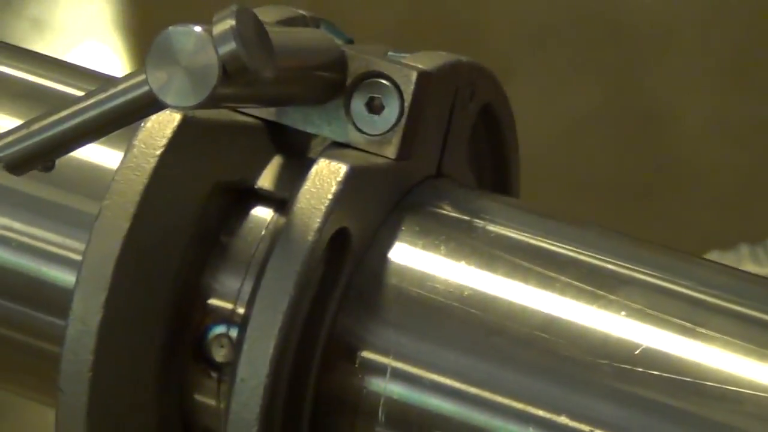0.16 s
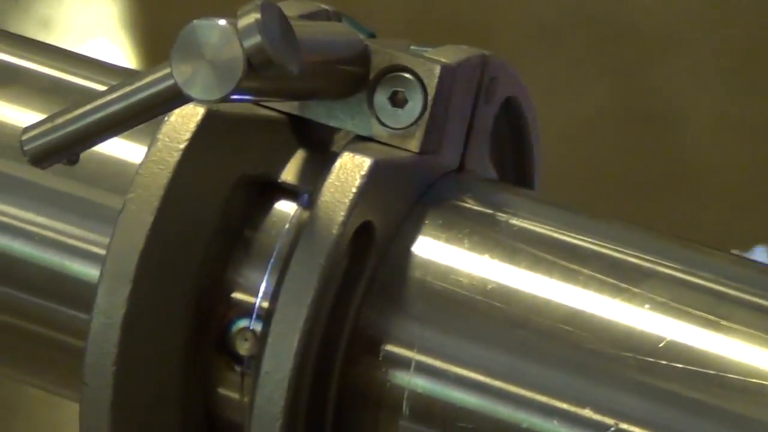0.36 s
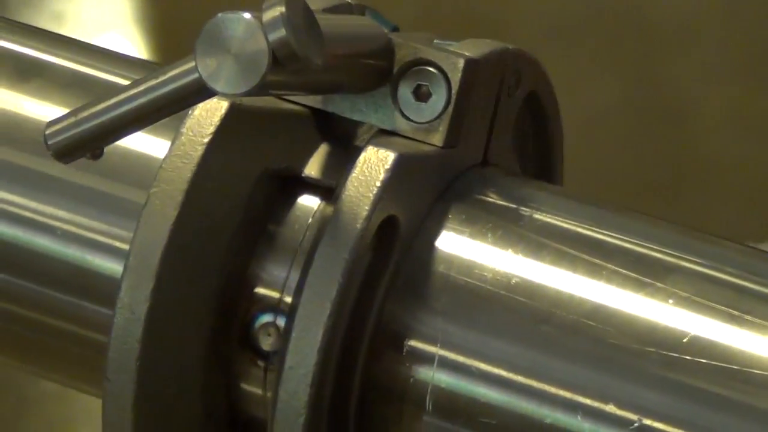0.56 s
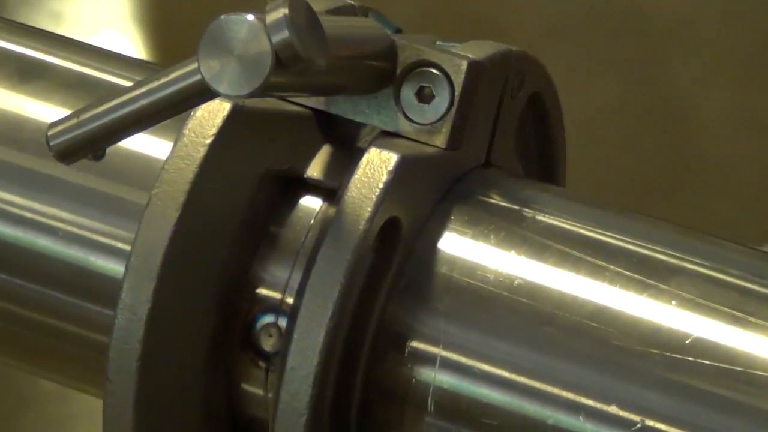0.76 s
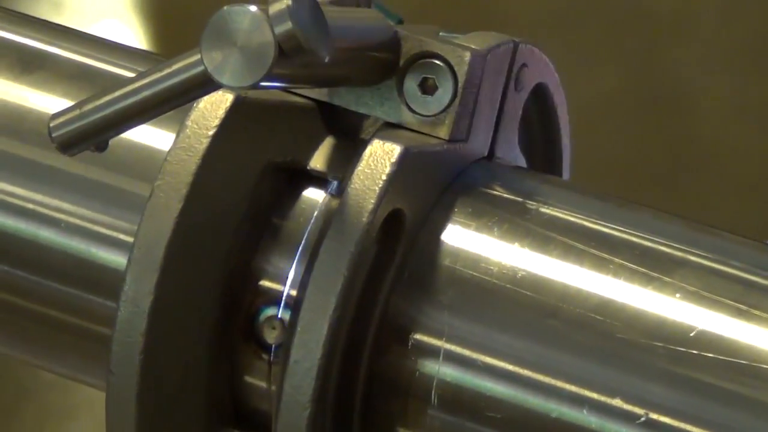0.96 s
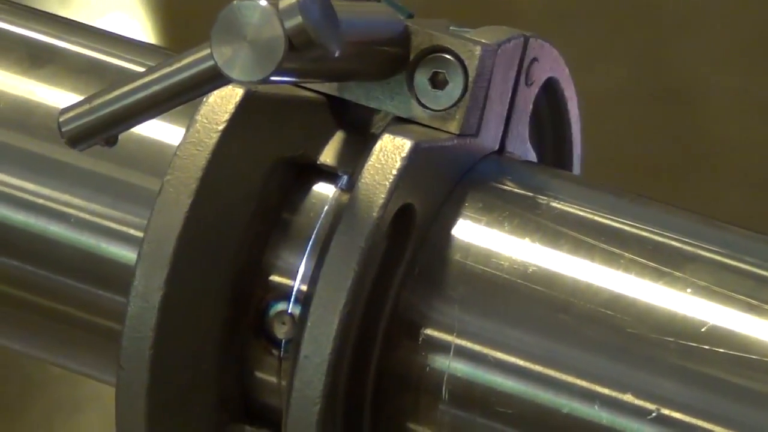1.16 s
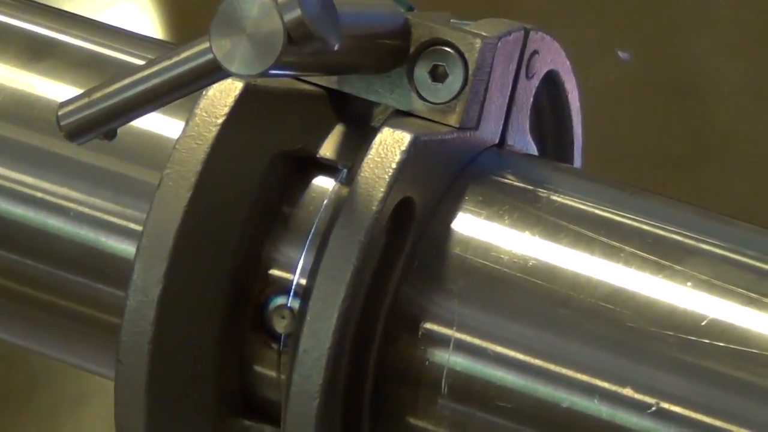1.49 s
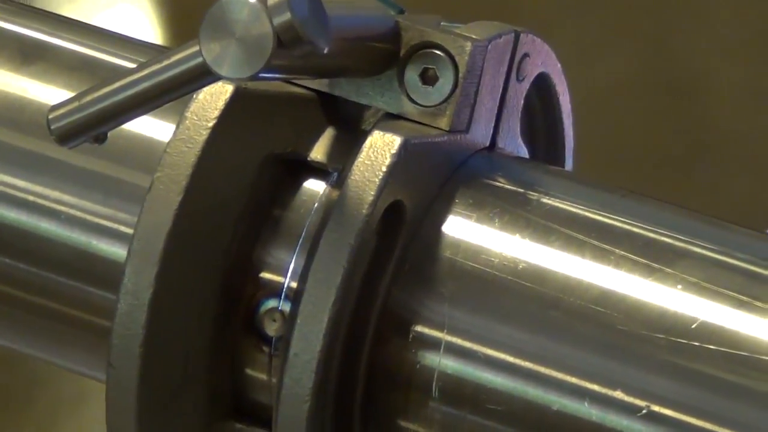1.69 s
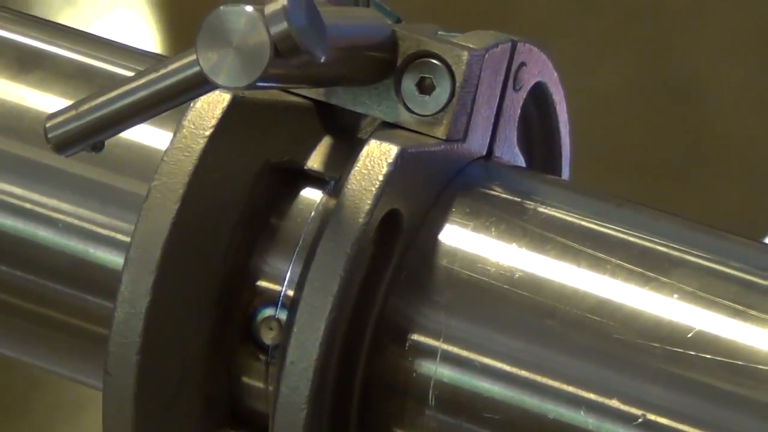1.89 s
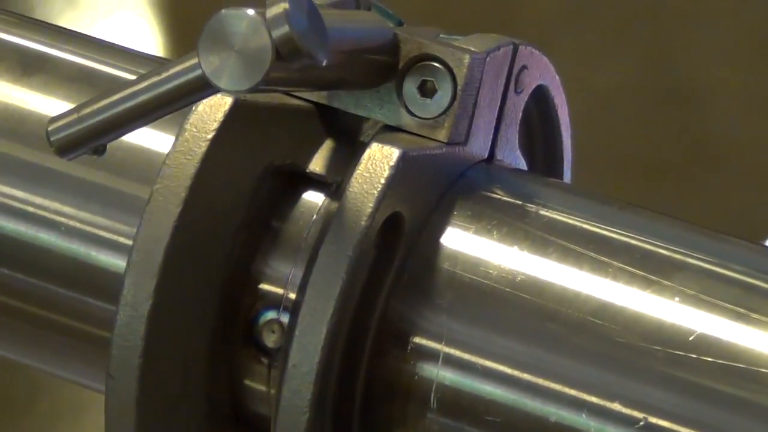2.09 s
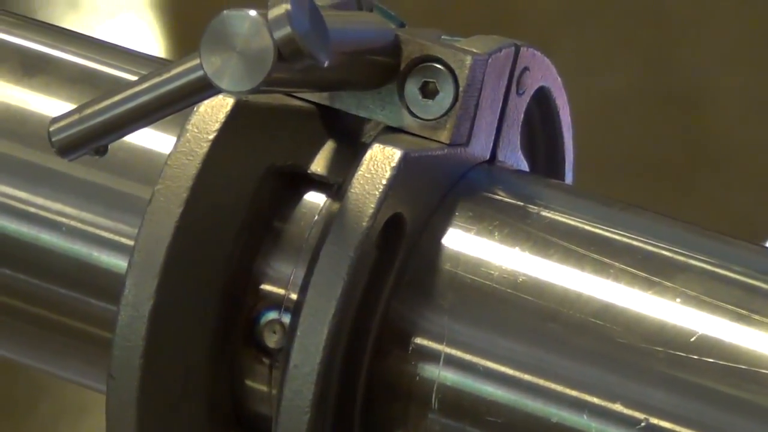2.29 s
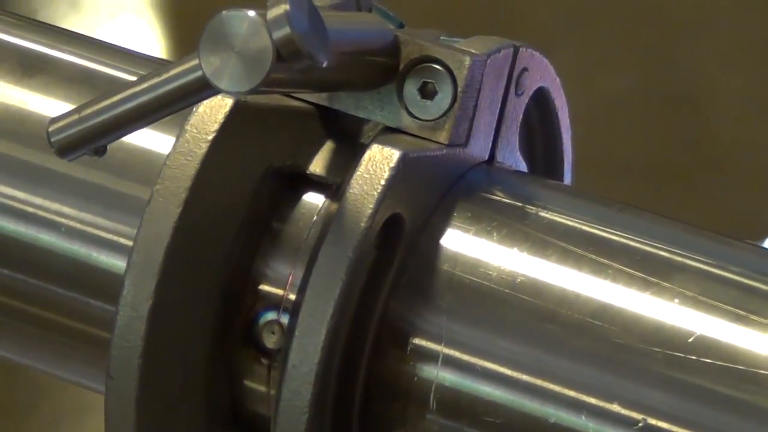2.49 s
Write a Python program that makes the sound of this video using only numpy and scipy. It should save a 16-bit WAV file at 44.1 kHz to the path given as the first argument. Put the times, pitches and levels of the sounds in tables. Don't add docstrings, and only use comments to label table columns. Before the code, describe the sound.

Loud gas hiss from a welding head on steel tube, clacking valve switches, slowly dying away

```python
import sys
import numpy as np
from scipy import signal
from scipy.fft import rfft, irfft, next_fast_len
from scipy.io import wavfile
from scipy.ndimage import uniform_filter1d, minimum_filter1d, map_coordinates

SR = 44100
rng = np.random.default_rng(int(sys.argv[2]) if len(sys.argv) > 2 else 0)


def voltage_ratio(decibels):
    exponent = np.asarray(decibels, float) / 20
    return 10 ** exponent


def wrap_up_sound(samples):
    columns = np.atleast_2d(samples).T
    tamed = np.clip(columns, -1, 1)
    steps = np.round(tamed * 32767).astype(np.int16)
    wavfile.write(sys.argv[1], SR, steps)


N = 116865


def unit(x):
    return x / np.sqrt(np.mean(x ** 2) + 1e-20)


def along(points, hz):
    f, value = np.transpose(points)
    return np.interp(np.log(hz + 1), np.log(f + 1), value)


def curves(rows):
    s, *columns = np.transpose(rows)
    return [np.interp(np.arange(N) / SR, s, column) for column in columns]


def wobble(rate):
    knots = rng.standard_normal(int(N * rate / SR) + 4)
    return map_coordinates(knots, [np.arange(N) * rate / SR])


def filtered(x, response):
    size = next_fast_len(N + SR // 2)
    spectrum = rfft(x, size) * response(np.fft.rfftfreq(size, 1 / SR))
    return irfft(spectrum, size)[..., :N]


def rush(colour, modes, ring_db, side, patchy_db):
    z = signal.stft(rng.standard_normal((2, N)), nperseg=512)[2]
    patches = uniform_filter1d(rng.standard_normal(z.shape[1:]), 4, 0)
    patches = uniform_filter1d(patches, 10, 1)
    pair = signal.istft(z * voltage_ratio(patchy_db * unit(patches)), nperseg=512)[1][:, :N]

    def response(f):
        power = 1
        for hz, width, db in modes:
            height = voltage_ratio(db + ring_db - along(colour, hz))
            power = power + height ** 2 / (1 + (2 * (f - hz) / width) ** 2)
        shape = voltage_ratio(along(colour, f)) * np.sqrt(power)
        return shape * [1 + 0 * f, voltage_ratio(along(side, f))]

    mid, diff = filtered(pair, response)
    return unit(np.array([mid + diff, mid - diff]))


def narrow(hz, width_hz, steady):
    phase = 2 * np.pi * np.cumsum(hz + 12 * wobble(30)) / SR
    return unit((steady + wobble(width_hz)) * np.cos(phase) + wobble(width_hz) * np.sin(phase))


# frequency in Hz, level in dB per Hz.
SHOP_COLOUR = [(15, -46), (25, -19), (350, -5), (380, -6), (423, -1), (471, -6.5), (511, -8.5), (585, -6.5),
               (15600, -37)]
# frequency in Hz, width in Hz, height over the air in dB.
FANS = [(200, 22, 2.5), (251, 14.5, 5.5), (364.4, 3.3, 14.5), (421, 6.2, 8), (670, 13, -8)]
# frequency in Hz, level in dB.
HUMS = [
    (29, -57),
    (58, -57),
    (99, -52.5),
]
# frequency in Hz, side under mid in dB.
SHOP_SIDE = [(60, -22), (240, -19.5), (950, -12), (3770, -8), (15000, -4)]
SHOP_DB = -37


def shop():
    out = 0
    for hz, db in HUMS:
        phase = 2 * np.pi * np.cumsum(hz + 1.14 * wobble(4.87)) / SR
        out = out + voltage_ratio(db + 3.3 * wobble(4.2)) * np.sin(phase)
    swell_s, swell_length_s = 2.47, .35
    swell = np.exp(-((np.arange(N) / SR - swell_s) / swell_length_s * 2) ** 2)
    out = out + voltage_ratio(-53) * swell * narrow(60, width_hz=40, steady=.3)
    fans = [(hz, width, db + along(SHOP_COLOUR, hz)) for hz, width, db in FANS]
    air = rush(SHOP_COLOUR, fans, 0, SHOP_SIDE, patchy_db=1.5)
    return out + voltage_ratio(SHOP_DB + 0.09 * wobble(1.8)) * air


# frequency in Hz, width in Hz.
TUBE = [(2935, 45), (3745, 65), (4530, 100), (4740, 50), (5285, 60), (6645, 50), (6850, 60), (7040, 90),
        (7330, 50), (7565, 55), (7770, 45), (7960, 35), (8590, 140), (8950, 70), (9340, 60), (9970, 65),
        (10350, 50), (11350, 50), (12100, 80), (13500, 200)]


def ringing(colour, ring_db):
    return [(hz, width, db + along(colour, hz)) for (hz, width), db in zip(TUBE, ring_db)]


def hollowed(x, dips):
    def response(f):
        gain = 1
        for hz, width, share in dips:
            gain = gain * (1 - share / (1 + (2 * (f - hz) / width) ** 2))
        return gain

    return filtered(x, response)


# opens in seconds, shuts in seconds, rise in seconds.
FILL_TIMES = [
    (.221, .4008, .04),
    (.607, .9048, .025),
]
# level in dB, slope in dB per second.
FILL_LEVELS = [
    (-18.5, 16),
    (-15.5, -11),
]
# frequency in Hz, level in dB per Hz.
FILL_COLOUR = [(900, -29.5), (2100, -19), (2700, -9), (5700, -11), (6500, -8), (9000, -4), (11500, -9),
               (12500, -12.5), (15700, -23.5)]
FILL_RING_DB = [5.5, 10.5, 3.5, -5, -4, 5.5, 9.5, -6, -5, -2, -10, -4, 4, 7, 4, 6, 7, -8, -3, 4]
# frequency in Hz, width in Hz, share removed.
INLET_DIPS = [(12450, 600, .7), (14900, 400, .5)]
# frequency in Hz, side under mid in dB.
NEAR_SIDE = [(60, -26), (240, -7), (950, -49), (3770, -16), (15000, -26)]


def filling():
    leak_db, shut_s = -12, .0006
    t, gain = np.arange(N) / SR, 0
    for (opens, shuts, rise), (db, slope) in zip(FILL_TIMES, FILL_LEVELS):
        rise_db = leak_db * np.clip(1 - (t - opens) / rise, 0, 1)
        is_open = (t > opens) * np.clip((shuts - t) / shut_s, 0, 1)
        gain = gain + voltage_ratio(db + slope * (t - opens) + rise_db) * is_open
    turbulence = voltage_ratio(0.44 * wobble(42.0) + 0.35 * wobble(300) + 1.4 * wobble(2500))
    hiss = rush(FILL_COLOUR, ringing(FILL_COLOUR, FILL_RING_DB), 0, NEAR_SIDE, patchy_db=0.5)
    return gain * turbulence * hollowed(hiss, INLET_DIPS)


# time in seconds, hiss in dB, low roar in dB.
VENT_ONE = [
    (.4008, -26, -51),
    (.414, -22.5, -37),
    (.435, -15.5, -30.5),
    (.52, -17, -25),
    (.55, -18, -23),
    (.6, -17, -22),
]
# time in seconds, hiss in dB, low roar in dB.
VENT_TWO = [
    (.9048, -42, -49),
    (.918, -22.5, -46),
    (.94, -18, -31.5),
    (1.05, -19.5, -31),
    (1.2, -22.5, -34.5),
    (1.4, -25.5, -35.5),
    (1.75, -28.5, -40),
    (2.15, -30.5, -43),
    (2.65, -33.5, -45),
]
# frequency in Hz, level in dB per Hz.
STRONG_COLOUR = [(1060, -38), (2000, -19), (2800, -6.5), (5900, -9), (6500, -6), (9000, -3.5), (11900, -4),
                 (12700, -10.5), (15700, -15.5)]
# frequency in Hz, level in dB per Hz.
WEAK_COLOUR = [(1060, -63), (2000, -18), (3200, -5), (5900, -8.5), (6600, -3.5), (8000, -4), (10000, -11),
               (12300, -7.5), (15700, -13.5)]
STRONG_RING_DB = [5.5, 4.5, -4.5, -0.5, 6, 13, 3, 5, 1, 0, 4, 9, 6, 5.5, 1, -5, -16, -4, -1, 4]
WEAK_RING_DB = [2.5, 14, 1.5, 8.5, -11, 0, 4, 5, 10.5, 1.5, 3, 3, -0.5, 2, -4, 1, 1, 1, 3, 6]
# frequency in Hz, level in dB per Hz.
ROAR_COLOUR = [(90, -46), (150, -30), (300, -14.5), (600, -6), (770, -16.5), (1100, -6.5), (2200, -13.5),
               (3600, -21), (5000, -40)]
# frequency in Hz, width in Hz, level in dB.
ROAR_TUBE = [(619, 90, 1), (969, 90, -1), (1410, 90, 0), (1740, 60, -1), (1950, 60, -4), (2550, 68, -5),
             (2930, 80, 0)]
# frequency in Hz, level in dB per Hz.
LATE_ROAR_COLOUR = [(59, -51), (100, -24), (207, -0.5), (317, -4.5), (618, -1.5), (900, -5), (1850, -12),
                    (3000, -23), (3900, -29), (6600, -120)]
STRONG_DB, WEAK_DB = -14.5, -36.5
VENT_SHUT_S = .6002


def venting():
    t = np.arange(N) / SR
    first = t < VENT_TWO[0][0]
    opened = t > VENT_ONE[0][0]
    shut_db = (-8 - 350 * (t - VENT_SHUT_S)) * (t > VENT_SHUT_S)
    first_db = (curves(VENT_ONE) + shut_db) * opened - 120 * ~opened
    hiss_db, roar_db = np.where(first, first_db, curves(VENT_TWO))

    strong = rush(STRONG_COLOUR, ringing(STRONG_COLOUR, STRONG_RING_DB), 0, NEAR_SIDE, patchy_db=2.5)
    weak = rush(WEAK_COLOUR, ringing(WEAK_COLOUR, WEAK_RING_DB), 0, NEAR_SIDE, patchy_db=0.46)
    share = np.clip((hiss_db - WEAK_DB) / (STRONG_DB - WEAK_DB), 0, 1)
    turbulence = voltage_ratio(0.58 * wobble(11.42) + 0.32 * wobble(250) + 0.41 * wobble(2400))
    hiss = turbulence * (np.sqrt(share) * strong + np.sqrt(1 - share) * weak)

    sputter = voltage_ratio(2.2 * wobble(300) + 0.98 * wobble(22.4))
    early = unit(sputter * rush(ROAR_COLOUR, ROAR_TUBE, -1.2, NEAR_SIDE, patchy_db=-0.9))
    late = rush(LATE_ROAR_COLOUR, ROAR_TUBE[:1], -6.0, SHOP_SIDE, patchy_db=1.55)
    return voltage_ratio(hiss_db) * hiss + voltage_ratio(roar_db) * np.where(first, early, late)


# time in seconds, pitch in Hz, level in dB.
WHISTLE = [(.76, 8680, -36), (.82, 8590, -23), (.9, 8490, -24), (.93, 8300, -45), (1.1, 7520, -37),
           (1.16, 7320, -31), (1.2, 7180, -26), (1.27, 7010, -31), (1.35, 6810, -37), (1.52, 6200, -54),
           (1.6, 5900, -43), (1.69, 5660, -40), (1.77, 5520, -44), (1.81, 5470, -37), (1.9, 5370, -42),
           (1.94, 5320, -37), (2.05, 5220, -38), (2.07, 5200, -60)]
# time in seconds, length in seconds, pitch in Hz, level in dB.
SINGS = [(.96, .05, 9900, -30), (1.41, .04, 8600, -33), (1.47, .05, 8590, -32), (1.1, .1, 8960, -35),
         (2.3, .08, 3780, -39), (2.41, .14, 3780, -36), (2.6, .14, 3730, -38), (2.43, .28, 4500, -43),
         (2.16, .1, 3960, -44), (.49, .05, 3760, -26), (.35, .1, 3750, -29), (.78, .22, 2940, -33),
         (.32, .16, 2950, -32), (.3, .1, 8700, -25), (.55, .18, 2930, -32), (.7, .3, 3750, -33),
         (.55, .1, 4740, -33), (1.6, .06, 3730, -38), (1.72, .06, 3745, -38), (.86, .1, 10000, -31),
         (.55, .05, 620, -35)]


def whistling():
    hz, db = curves(WHISTLE)
    t = np.arange(N) / SR
    (opens, shuts, _), (_, shuts_again, _) = FILL_TIMES
    on = (t > WHISTLE[0][0]) & ((t < shuts_again) | (t > VENT_TWO[1][0]))
    out = on * voltage_ratio(db + 1.5 * wobble(35)) * narrow(hz, width_hz=100, steady=1.5)
    for s, length, sing_hz, sing_db in SINGS:
        swell = np.exp(-((t - s) / length * 2) ** 2)
        out = out + voltage_ratio(sing_db) * swell * narrow(sing_hz, width_hz=70, steady=1.6)
    pause_s = .02
    paused = sum((t > s) & (t < s + pause_s) for s in (shuts, VENT_SHUT_S, shuts_again))
    paused = paused + (t < opens + pause_s)
    return out * uniform_filter1d(1. - paused, size=90)


# time in seconds, peak in dB.
POPS = [(.4245, -24), (.452, -17), (.4885, -20), (.5205, -19), (.531, -18), (.541, -19), (.5665, -13),
        (.5705, -13), (.5765, -14), (.587, -15), (.5885, -15)]


def popping():
    pop_s = .00013
    out, u = np.zeros(N), np.arange(SR // 200) / SR / pop_s
    for s, db in POPS:
        out[round(s * SR):][:len(u)] += voltage_ratio(db) * np.sin(u) * np.exp(-u / 3) * 1.6
    return out


# time in seconds, peak in dB, pitch in Hz, low thump in dB.
CLACKS = [
    (.4035, -2, 10300, -30),
    (.4086, -4, 7200, -30),
    (.6027, -12, 6500, -4),
    (.6077, -4, 7200, -20),
    (.9075, -1, 10000, -28),
    (.9126, -4, 7200, -28),
]
# time in seconds, level in dB.
KNOCKS = [
    (.2152, -24),
    (.2163, -25),
    (.2183, -14),
    (.2192, -19),
    (.2212, -24),
    (.2262, -25),
]
# frequency in Hz, level in dB, T60 in seconds.
HOUSING = [(730, -8, .03), (1120, -7, .025), (1500, -10, .015), (2450, 0, .012), (3900, -2, .008),
           (4400, -3, .008), (3100, -6, .006), (6300, -3, .006)]


def valve():
    clack_t60_s, thump_t60_s, rattle_t60_s = .0033, .003, .008
    out, t = np.zeros(N + SR), np.arange(SR // 10) / SR
    for s, db, hz, thump_db in CLACKS:
        crack = voltage_ratio(-7) * np.gradient(rng.standard_normal(len(t)))
        ring = np.sin(2 * np.pi * hz * t) + crack
        thump = -voltage_ratio(thump_db - 60 * t / thump_t60_s) * np.sin(2 * np.pi * 1900 * t)
        out[round(s * SR):][:len(t)] += voltage_ratio(db - 60 * t / clack_t60_s) * ring + thump
    for s, db in KNOCKS:
        place = out[round(s * SR):][:len(t)]
        for hz, mode_db, t60 in HOUSING:
            decay = voltage_ratio(db - 6 + mode_db + rng.normal(0, 2) - 60 * t / t60)
            place += decay * np.sin(2 * np.pi * hz * t)
        rattle = np.gradient(uniform_filter1d(rng.standard_normal(len(t)), size=4)) * 2
        place += voltage_ratio(db - 1 - 60 * t / rattle_t60_s) * rattle
    return out[:N]


def blow_response(f):
    return (1j * f / (220 + 1j * f)) ** 2 / (1 + (f / 15000) ** 6)


def room(x):
    t60_s, side_db = .16, -6.5
    t = np.arange(SR // 3) / SR
    mid, side = rng.standard_normal((2, len(t))) * voltage_ratio(-60 * t / t60_s) * (t > .004)
    tail = mid + voltage_ratio(side_db) * side * [[1], [-1]]
    return signal.fftconvolve(x, tail / np.linalg.norm(mid), axes=1)[:, :N]


# frequency in Hz, width in Hz, share removed.
TUBE_DIPS = [(4150, 160, .55), (5000, 200, .35)]


def scene():
    near = hollowed(filling() + venting(), TUBE_DIPS) + whistling()
    near = near + filtered(popping() + valve(), blow_response)
    left_db = -0.5
    balance = voltage_ratio([[left_db / 2], [-left_db / 2]])
    return near * balance + voltage_ratio(-11) * room(near) + shop()


def top_cut(x):
    return signal.sosfilt(signal.butter(12, 15800, fs=SR, output="sos"), x)


def record(dry):
    limit, hold_s, top_hz = .68, .012, 15780
    size = round(hold_s * SR)
    need = np.minimum(1, limit / (np.abs(dry).max(axis=0) + 1e-9)) ** .5
    held = minimum_filter1d(need, size=size, origin=size // 4)
    gain = uniform_filter1d(held, size=size // 2)
    mix = filtered(dry * gain, lambda f: f < top_hz)
    return top_cut(mix)


dry = scene()
out = record(dry)
wrap_up_sound(out)
```